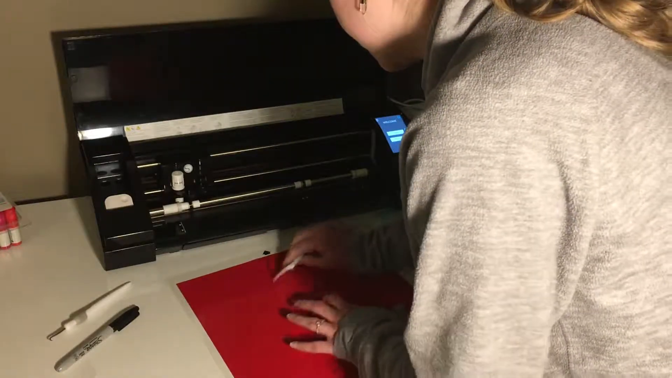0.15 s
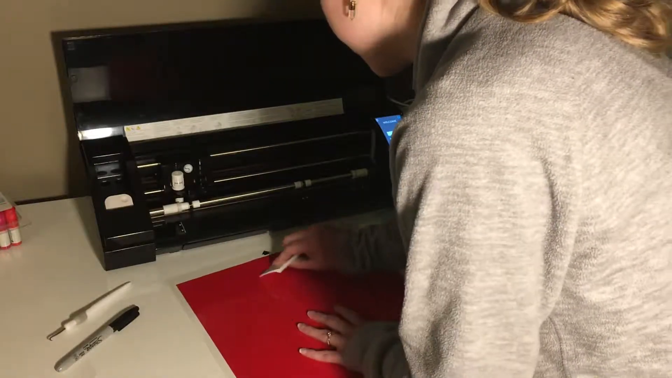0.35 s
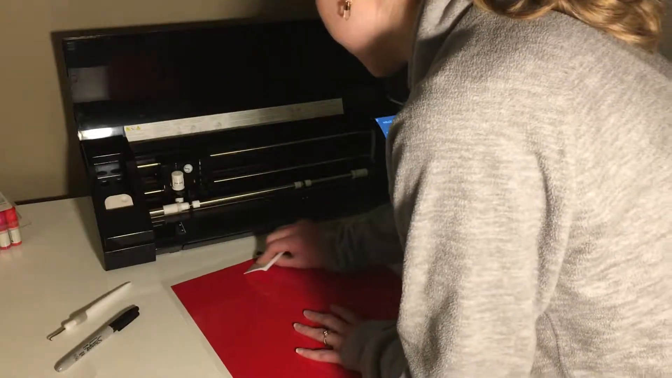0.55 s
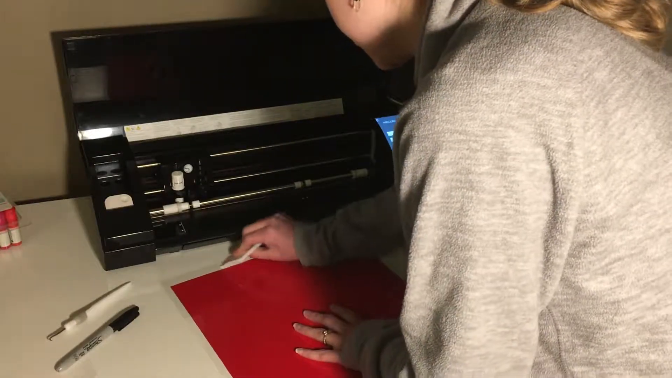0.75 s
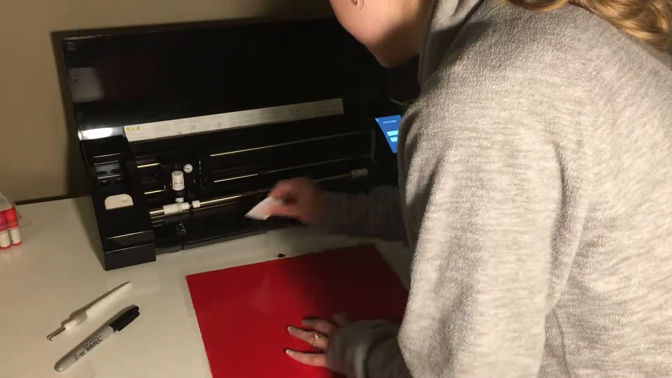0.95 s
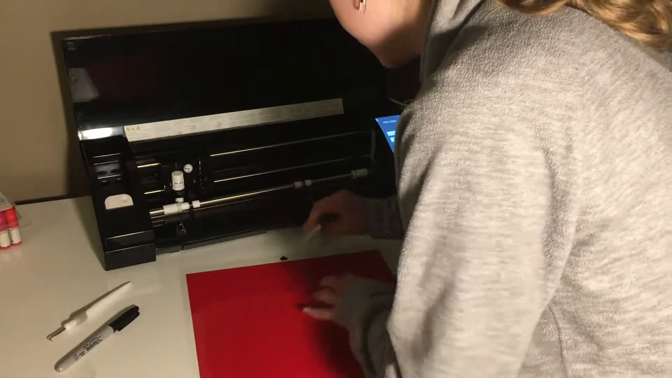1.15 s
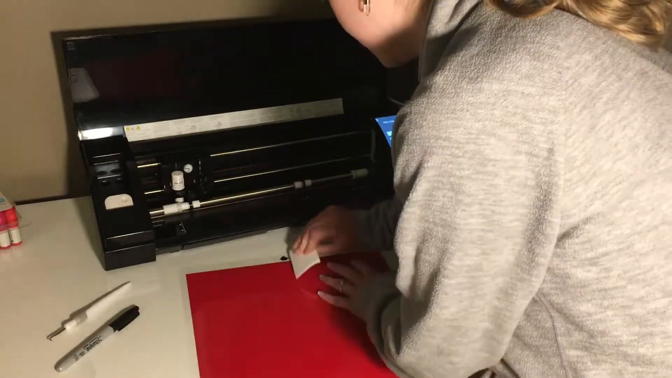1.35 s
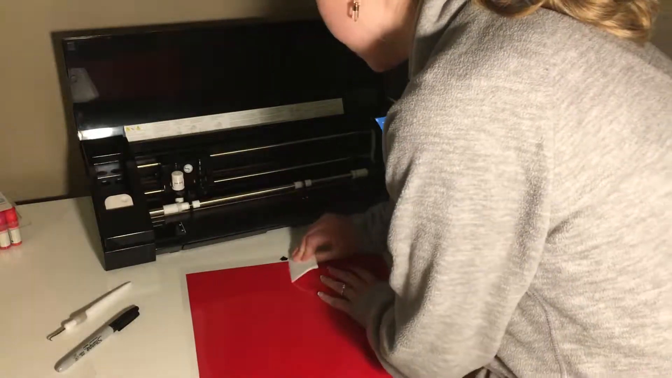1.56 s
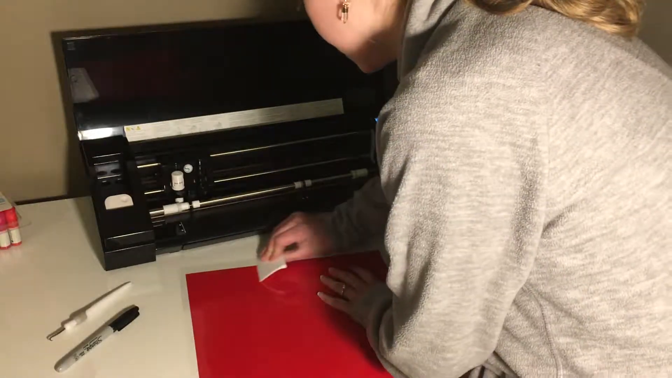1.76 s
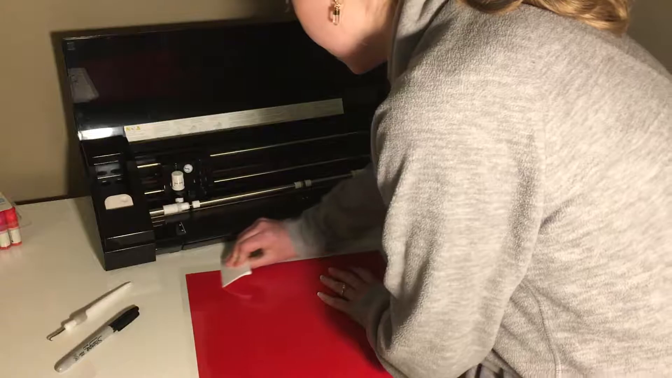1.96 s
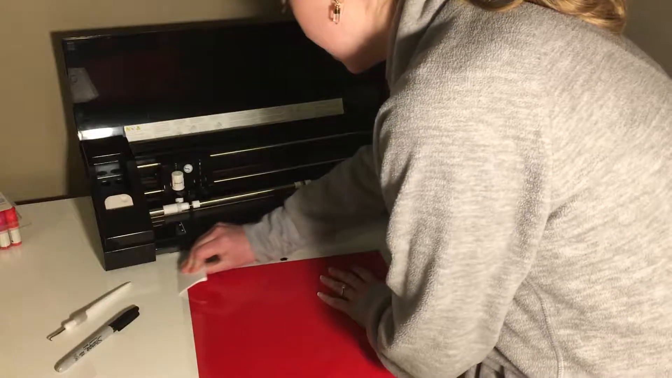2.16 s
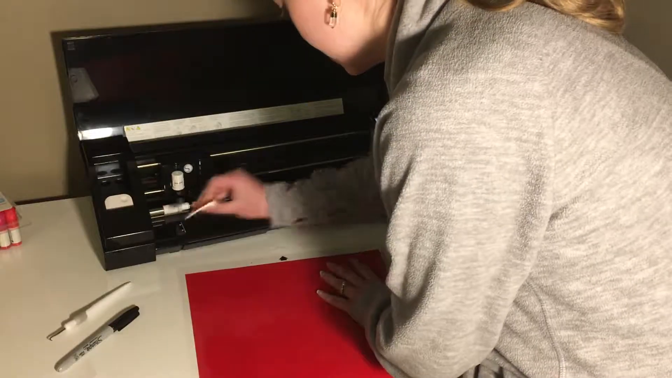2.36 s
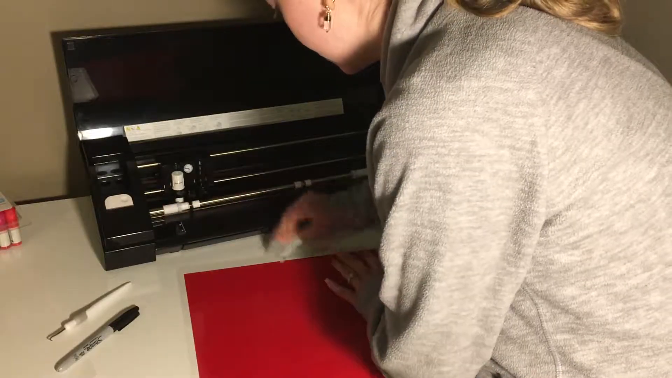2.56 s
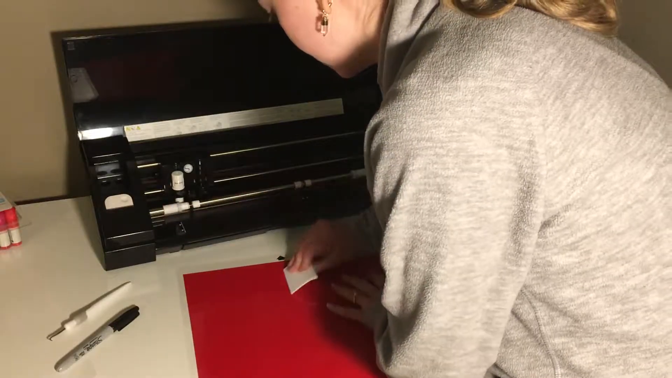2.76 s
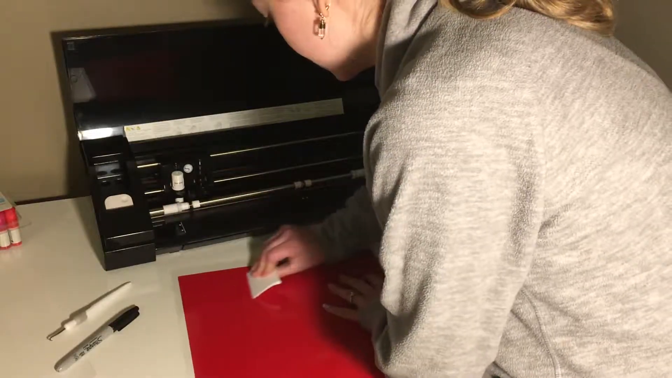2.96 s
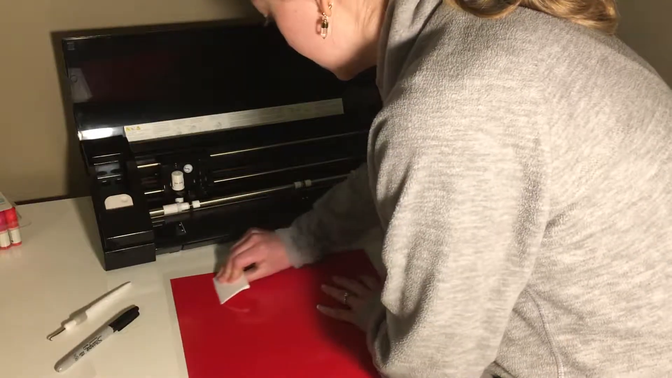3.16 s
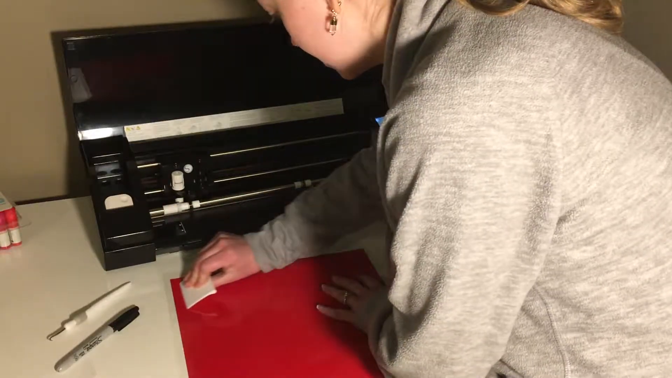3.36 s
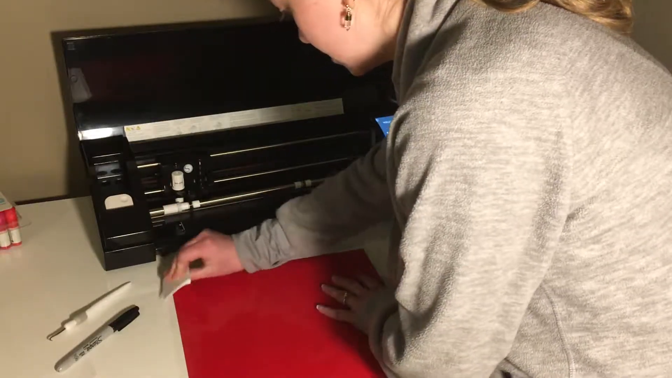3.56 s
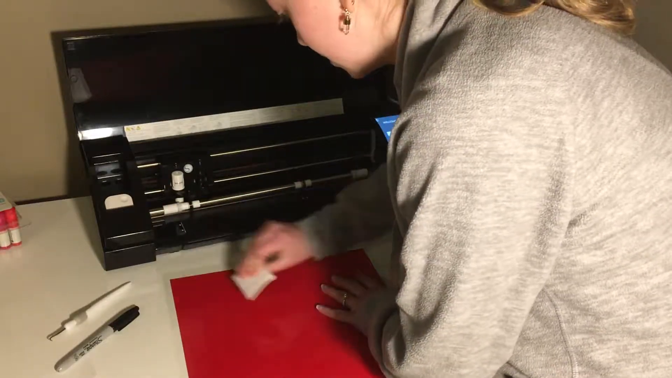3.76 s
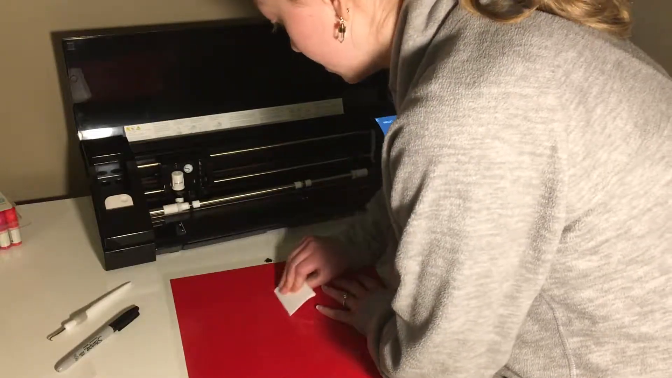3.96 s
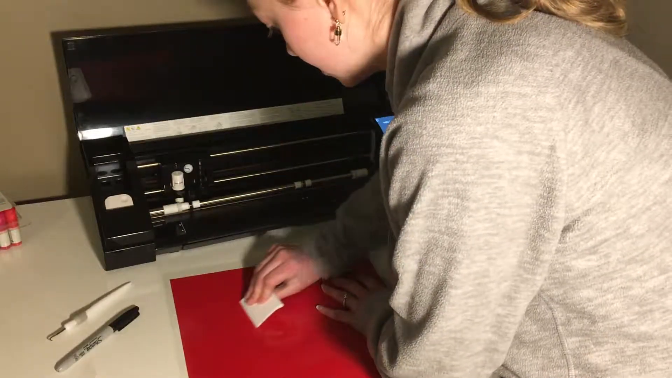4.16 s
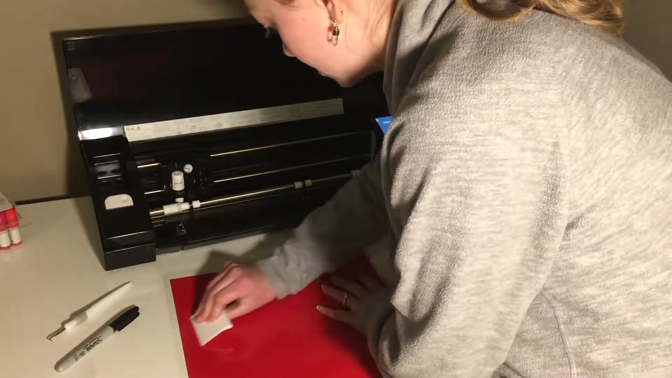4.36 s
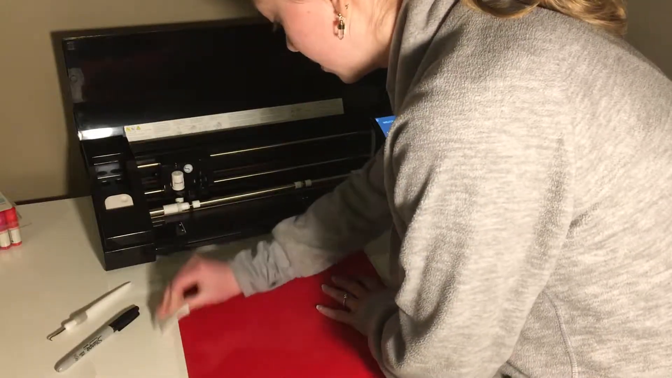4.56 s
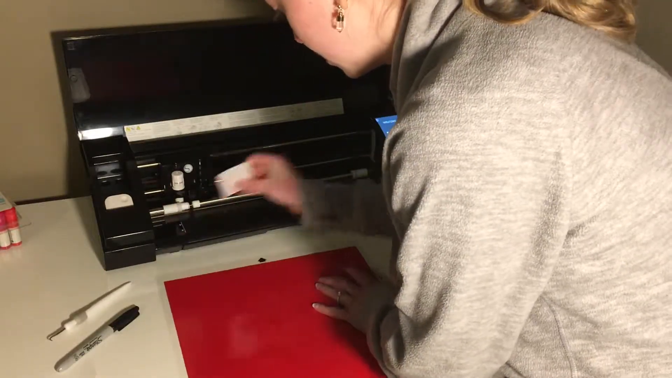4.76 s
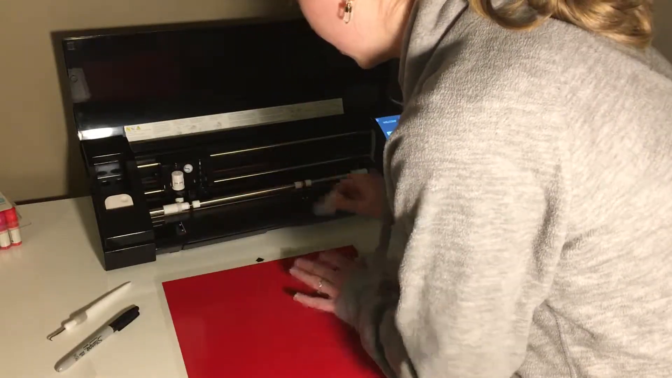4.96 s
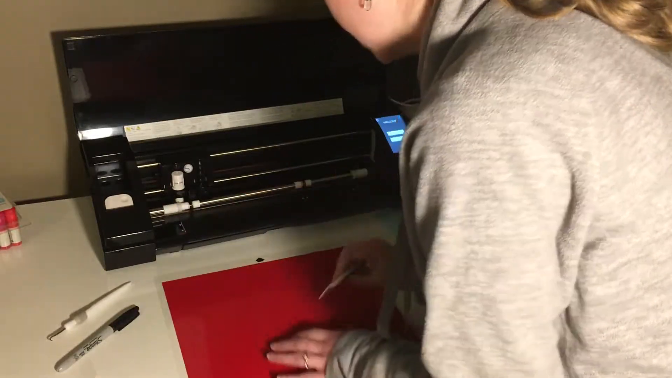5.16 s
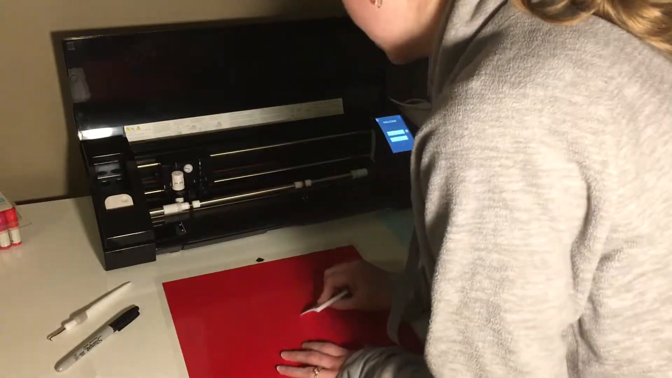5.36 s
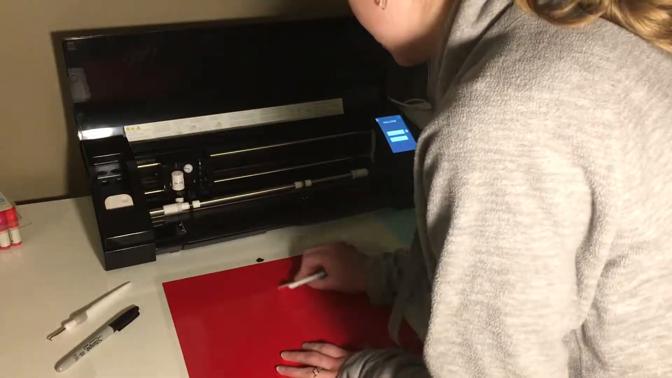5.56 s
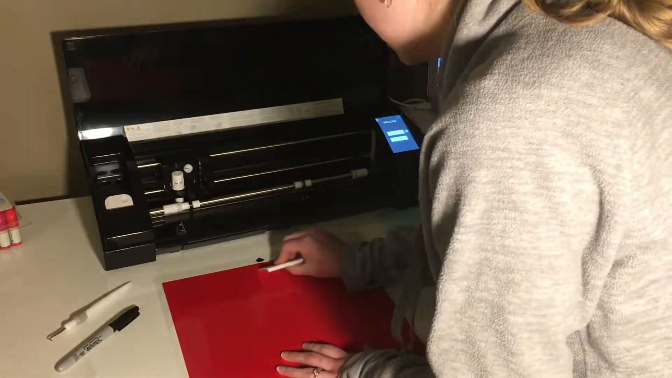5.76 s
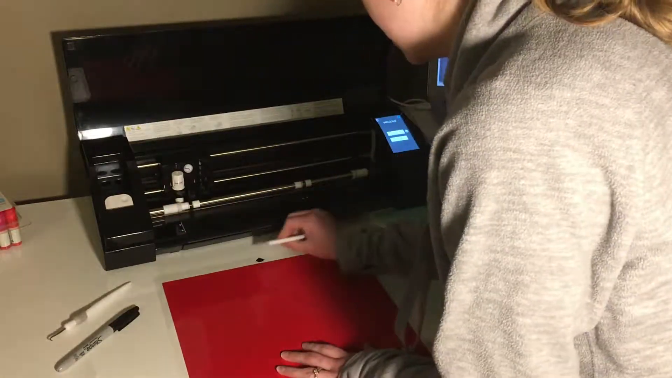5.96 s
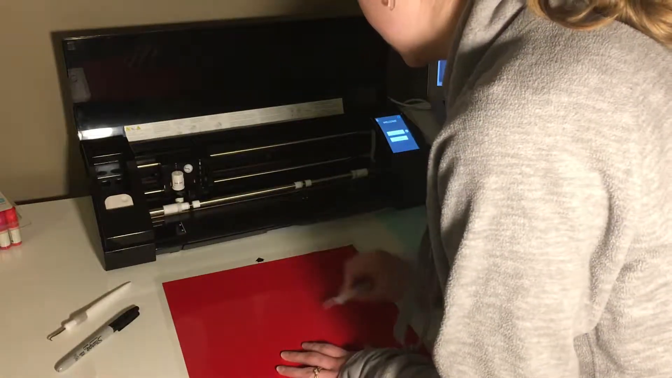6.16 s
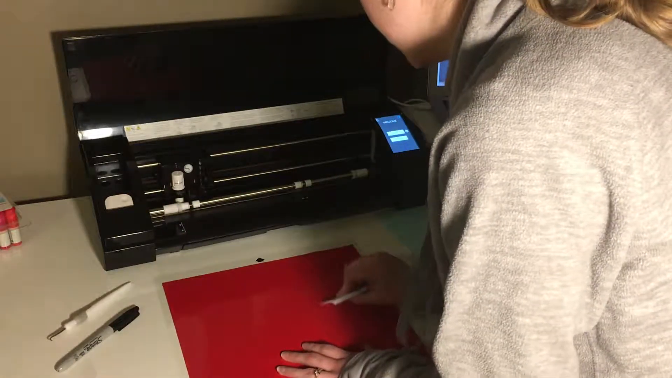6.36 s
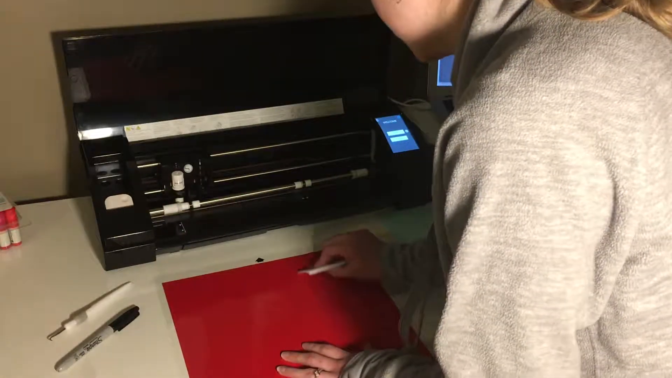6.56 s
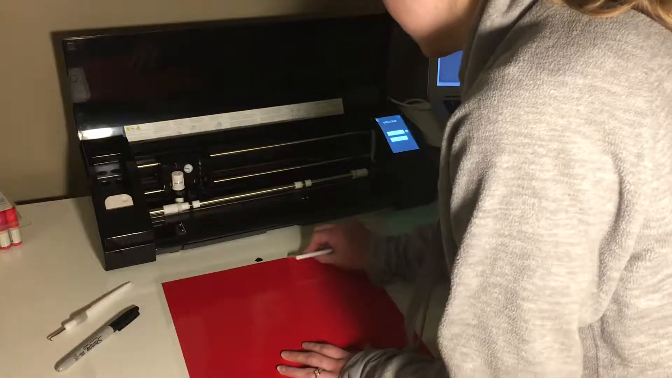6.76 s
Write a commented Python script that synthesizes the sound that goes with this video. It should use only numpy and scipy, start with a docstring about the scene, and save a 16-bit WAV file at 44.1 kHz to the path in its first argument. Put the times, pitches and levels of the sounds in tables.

```python
"""Scraper on a vinyl sheet

A plastic scraper is set down and dragged again and again over a vinyl sheet on a table, in a small quiet room.
Strokes are random friction noise passed through the resonances of scraper and table top, plus edge hiss.
Taps are short noise bursts with a ring, thuds are fading sine waves, and finger slides, sway and air are
shaped noise. Both channels carry the same sound."""
import sys
import numpy as np
from scipy import signal
from scipy.fft import rfft, irfft, next_fast_len
from scipy.io import wavfile
from scipy.ndimage import uniform_filter1d, map_coordinates

SR = 44100
rng = np.random.default_rng(int(sys.argv[2]) if len(sys.argv) > 2 else 0)


def persist_wave(psi):
    """Save psi, clipped to +-1, as 16-bit WAV."""
    counts = np.round(np.clip(psi, -1, 1) * 32767).astype(np.int16)
    wavfile.write(sys.argv[1], SR, np.atleast_2d(counts).T)


N = 300321  # length [samples]

# Strokes, one list each: (time [s], blade ring [dB], table top [dB re ring], edge hiss [dB re ring],
# upper blade modes [dB re ring])
STROKE_CURVES = [
    [(0.24, -77.5, 10, -5, 3), (0.27, -83, 6, 9, -3), (0.29, -68.5, -6, -4, -6),
     (0.416, -55.5, -1, -7.5, -5.5), (0.496, -73, 1.5, -6, -7), (0.654, -54, -3, -8, -7),
     (0.716, -56.5, -2.5, -6.5, -11.5), (0.744, -61.5, 1.5, -3, -1), (0.818, -56.5, -9, -12, -10.5),
     (0.838, -71.5, 1, 7, 0), (0.862, -63, -4.5, 2, -3.5), (0.98, -71.5, -14, 15, 9.5),
     (1.042, -66.5, -11, 8, 4), (1.11, -94, 3, 0, -4)],
    [(1.47, -94, 8, -2, 1), (1.52, -73, -3.5, -7, -9), (1.586, -57.5, -3.5, -8, -7),
     (1.756, -55, 0, -11.5, -5), (1.984, -53.5, -4, -8.5, -4), (2.014, -56, 0, -5.5, -0.5),
     (2.132, -55.5, -1, -8, -6.5), (2.178, -63.5, 6.5, -2, -6), (2.186, -51.5, -9, 1, -4.5),
     (2.236, -71, 3, -0.5, -4), (2.3, -96, 11, 3, -14)],
    [(2.39, -72, 3, -2, -2), (2.404, -74, -2, 15, -3), (2.418, -69.5, -10, 6, 2), (2.46, -99, 15, 6, 1)],
    [(2.77, -70, 5, -6, -4), (2.79, -76.5, -0.5, 6.5, -6), (2.864, -56.5, -4.5, -7, -5.5),
     (2.94, -50.5, -7.5, -5.5, -7), (3.018, -51.5, -6, -11, -5), (3.112, -66.5, 3, -2, -1.5),
     (3.138, -56, -2, -10, -8.5), (3.224, -54, -2, -8, -5), (3.47, -60.5, -1.5, -7.5, -12),
     (3.48, -58.5, 2.5, -3, -8), (3.546, -93.5, 16, 3, -6), (3.62, -99, 11, -5, -3)],
    [(3.985, -70, 3, -5, -6), (4.091, -54, -5, -5, -5), (4.217, -50, -4.5, -2.5, -2),
     (4.287, -54.5, -4, -2.5, 0), (4.327, -49.5, -8, -6.5, -3), (4.387, -60.5, 0.5, 1, 3),
     (4.421, -53.5, -4.5, -7, -4.5), (4.487, -64, 3.5, 0.5, -1.5), (4.513, -54.5, -9.5, -0.5, -2),
     (4.61, -95.5, 6.5, 0, -4)],
    [(5.32, -72, -2, 3, 2), (5.334, -73.5, -2.5, -8, -8), (5.44, -61, -7, -1.5, -5),
     (5.582, -53, -8, -3, -3.5), (5.788, -56, -4, -8.5, -3), (5.796, -59, 0, -5, -0.5),
     (5.832, -59.5, 3, -8, -2.5), (5.868, -54.5, -5.5, -9, -3), (5.908, -59, -0.5, -8, -7),
     (6.0, -102, 19.5, 4, -6)],
    [(6.28, -71.5, 3, 0, -1), (6.318, -63, -5, 0.5, 1), (6.366, -56, -8, -2.5, -7),
     (6.426, -54.5, -2.5, -1.5, -1.5), (6.452, -49.5, -9, -6, -4), (6.462, -52, -5.5, -1, -2),
     (6.59, -49.5, -8, -6.5, -6), (6.782, -60, 1, -5, -4), (6.795, -53.5, -2, -9, -7)],
]
# Where each stroke runs, at its start and its end: (deep table modes [dB re high ones],
# favour of the lower part of the high modes [dB], favour of the lower part of the deep modes [dB])
STROKE_PLACE = [((1.5, 3, 14), (0, 11, 5.5)), ((2.5, 6, 16), (1, 4.5, -5)), ((3, 4, -1.5), (3, 7, -1.5)),
                ((-0.8, 0.5, 0.5), (-0.4, 6.5, 8)), ((-2, -11.5, 0.4), (-2, 1.5, -0.4)), ((-2.5, -6, 2),
                (-0.5, 6, 1.8)), ((1.5, 0.4, -8.5), (-2.5, 2, -3))]
# How each stroke is held: (grip modes [dB re lower blade modes], fizz [dB re dull hiss],
# favour of the upper blade modes under the topmost ones [dB])
STROKE_HOLD = [(-3.5, -2, 3), (0.5, -6.5, 6.5), (-11, -1, 6), (0.9, -4, 7.5), (-0.2, -1, 6), (-1, -3.5, 3),
               (-0.6, -8.5, 3)]
# Table frame hum, one value for each stroke: level [dB re table top]
STROKE_HUM = [-3.5, -6.5, 7, -6, -4, -7.5, -4]
# Scraper sliding in the fingers while lifted: (time [s], level [dB])
FINGER_SLIDE = [(4.655, -76), (4.689, -75.5), (4.785, -68.5), (4.853, -81), (4.909, -95), (4.93, -90)]
# Soft resonance of that slide: (frequency [Hz], width [Hz])
FINGER_RESONANCE = (2760, 210)
# Contacts of the edge: (time [s], level [dB], ring frequency [Hz], ring strength [dB],
# skid strength [dB re tick], brightness [dB per octave])
EDGE_TAPS = [(0.2126, -36, 3500, 8, -0.5, -3.5), (0.275, -50, 9000, 14, 2, 0),
             (0.806, -44, 2580, 24, 4, -4), (0.863, -45, 1610, 16, 6.5, -2.5),
             (1.182, -53.5, 5670, 18, -4, 0), (1.381, -64, 2750, 18, 1, -4),
             (1.4182, -33.5, 3380, 9, -4, -2), (1.432, -52.5, 2000, -13, 9.5, -4.5),
             (2.148, -31.5, 3750, 12.5, -1, 3), (2.188, -37, 3000, 6, -5, 0),
             (2.3509, -44, 4500, -4, 2, -1.5), (2.378, -49.5, 4700, 7, 7.5, -2.5),
             (2.408, -36.5, 12700, 9, -6, 7), (2.41, -41, 8900, 10, -7, 1),
             (2.742, -44, 1700, 7, 7.5, -3.5), (3.475, -43, 9000, 3, 1, -1),
             (3.9615, -33, 7400, 6, -3, -4.5), (4.507, -51, 3170, 5, -24, 0),
             (4.648, -40, 12900, 10, -5, 7), (4.666, -52, 13500, 9, -15, 2),
             (4.692, -49.5, 4500, 7, 4.5, -4), (4.867, -54, 2190, -13, 7, -4),
             (4.891, -50, 10700, 8, -3, -2), (4.968, -58, 3560, 0, -1.5, -2),
             (5.277, -55.5, 2600, 19, -5, -2), (5.3, -57, 13000, 14, -6, 5),
             (5.313, -42, 4520, 10, -11, -2), (5.3363, -50, 2030, 10, 3, -5), (5.929, -44, 12500, 9, -6, 5),
             (6.26, -38.5, 2050, 12, 0.5, -2.5), (6.737, -27.5, 12500, 12, -8, -3.5),
             (6.742, -34, 11000, 8, -8, 9), (6.8034, -21, 3040, 14, 2, -5)]
# Thuds through the table legs: (time [s], level [dB], share of the lowest mode [0-1])
TABLE_THUDS = [(0.248, -50, 0.6), (0.799, -54, 0.1), (1.419, -48, 0.57), (2.149, -43, .1),
               (2.186, -39.5, 0), (2.76, -43, 0.72), (3.491, -41.5, 0.28), (3.969, -42, 0.6),
               (4.498, -52, 0.7), (4.69, -64, 0.1), (5.899, -49, 0.04), (6.266, -48.5, 0.3),
               (6.74, -43, 0.25)]
# Low modes of the table on its legs: (frequency [Hz], time to fade by 60 dB [s])
LEG_MODES = [(30, 0.52), (76, 0.17), (125, 0.072)]
# Rocking of table and stand: (time [s], slow rocking [dB], quick rocking [dB])
ROCKING_CURVES = [(0.0, -58.5, -68), (0.09, -47, -79), (0.25, -53.5, -59), (0.51, -43, -64),
                  (0.95, -55, -65), (1.86, -46, -64), (2.18, -56, -68), (2.29, -45.5, -63),
                  (3.58, -52, -65), (3.72, -39, -73), (3.87, -47, -63), (5.31, -48, -68.5),
                  (5.54, -65.5, -68), (6.05, -44.5, -59), (6.22, -54, -71), (6.35, -59, -56),
                  (6.54, -49, -59), (6.81, -57, -69)]
# Hum of the table frame: (frequency [Hz], relative level [dB])
FRAME_SPECTRUM = [(40, -18), (62, 1.5), (76, 6), (90, -7.5), (125, -4.5), (170, -20), (250, -56)]
# Hiss of the scraping edge: (frequency [Hz], relative level per Hz [dB])
EDGE_SPECTRUM = [(2940, -9), (5000, -6.5), (5950, -7), (6780, -1), (11100, -1), (12100, 1.5),
                 (15100, -11.5), (15900, -2)]
# Quiet room and microphone hiss: (frequency [Hz], relative level per Hz [dB])
AIR_SPECTRUM = [(26, -23), (45, 4.5), (70, -8.5), (139, -21), (192, -11), (400, -21), (654, -23.5),
                (2920, -28.5), (3300, -29.5), (8190, -28), (15900, -34.5)]
# Fading of the room's answer: (frequency [Hz], time to fade by 60 dB [s])
ROOM_DECAY = [(200, 0.54), (2000, 0.18), (10000, 0.071)]
# Sharp modes of the scraper blade: (frequency [Hz], width [Hz], level [dB])
BLADE_MODES = [(2360, 42, -1.5), (2450, 76, -3.5), (2680, 110, -11), (3043, 133, -0.5), (3450, 97, -2),
               (3400, 170, 1), (4050, 71, -3), (4500, 110, -6)]
# Blur of the many weak blade modes: (frequency [Hz], level [dB])
BLADE_BLUR = [(1500, -52), (2200, -2.5), (3200, -1), (4300, -8.5), (6000, -13), (10000, -23)]
# Sharp modes of the grip: (frequency [Hz], width [Hz], level [dB])
GRIP_MODES = [(1535, 46, -2.5), (1660, 48, -8), (1951, 55, 1)]
# Blur of the weak grip modes: (frequency [Hz], level [dB])
GRIP_BLUR = [(900, -35), (1400, -11), (2100, -9), (2800, -29)]
# Higher sharp modes of the table top: (frequency [Hz], width [Hz], level [dB])
HIGH_TOP_MODES = [(550.4, 34, 1), (646.4, 27, 2), (901.5, 31, -1), (1012, 25, -2), (1234, 18, -5.5)]
# Blur of the weak higher table modes: (frequency [Hz], level [dB])
HIGH_TOP_BLUR = [(350, -33), (500, -9.5), (1200, -9), (1800, -61)]
# Deep sharp modes of the table top: (frequency [Hz], width [Hz], level [dB])
DEEP_TOP_MODES = [(205.4, 24.4, -4.5), (257, 11, 4.5), (359, 27, -3), (415, 12, -14.5)]
# Blur of the weak deep table modes: (frequency [Hz], level [dB])
DEEP_TOP_BLUR = [(120, -27), (200, -17.5), (450, -9.5), (650, -44)]

AIR_DB, HUM_REST_DB = -74.5, -75  # quiet air; frame hum at rest
ROOM_DB = -20.0  # the room's answer to the taps
FINGER_HISS_DB = 2.5  # relative to the soft resonance
HUM_GROWS_DB = 4.5  # from start to end of a stroke, as the arm reaches out
GRIP_WITH_STEEP, FIZZ_WITH_STEEP = -0.15, 0.36  # dB gained per dB of the upper blade modes
SKID_S, SKID_GROWS_S = 0.017, 0.00039  # length setting at skid strength 0 dB [s]; growth [s per dB]
TOP_HZ = 15950  # nothing is kept from here up


def amp(db):
    """Gain of a level in dB."""
    return 10 ** (np.asarray(db) / 20)


def unit(x):
    """Scale x to an average strength (rms) of 1."""
    return x / np.sqrt(np.mean(x ** 2) + 1e-20)


def along(points, hz):
    """Read (frequency, value) points at any frequency, on a log axis."""
    f, v = np.transpose(points)
    return np.interp(np.log(hz + 1), np.log(f + 1), v)


def curves(rows):
    """One value per sample for each column after the time."""
    s, *cols = np.transpose(rows)
    return [np.interp(np.arange(N) / SR, s, c) for c in cols]


def gate(rows, fade=0.016):
    """1 while a table lasts, with short fades outside it."""
    start, end = rows[0][0], rows[-1][0]
    return np.interp(np.arange(N) / SR, [start - fade, start, end, end + fade], [0, 1, 1, 0])


def wobble(rate):
    """A smooth random curve, with rate random points a second."""
    points = rng.standard_normal(int(N * rate / SR) + 4)
    return map_coordinates(points, [np.arange(N) * rate / SR])


def filtered(x, response):
    """Multiply the spectrum of x by a response that depends on frequency."""
    m = next_fast_len(N + SR // 2)
    return irfft(rfft(x, m) * response(np.fft.rfftfreq(m, 1 / SR)), m)[..., :N]


def coloured(x, spectrum):
    """x shaped by a spectrum of (frequency, dB) points, at rms 1."""
    return unit(filtered(x, lambda hz: amp(along(spectrum, hz))))


def modes(table, f):
    """Response of several resonances added up, with alternating signs."""
    total = 0
    for k, (centre, width, db) in enumerate(table):
        resonance = 1j * f * width / (centre * centre - f * f + 1j * f * width)
        total = total + (-1) ** k * amp(db) * resonance
    return total


def body(x, peaks, blur):
    """x through sharp modes over the blur of many weak ones, at rms 1."""
    return unit(filtered(x, lambda hz: np.hypot(np.abs(modes(peaks, hz)), amp(along(blur, hz)))))


def split(x, edge_hz):
    """The parts of x under and over a frequency, each held at an even rms of 1."""
    low = filtered(x, lambda hz: 1 / (1 + (hz / edge_hz) ** 8))
    return [part / np.sqrt(np.abs(uniform_filter1d(part ** 2, size=8000)) + 1e-20) for part in (low, x - low)]


def tipped(x, edge_hz, favour_db):
    """x with its lower part favoured over its upper part by a number of dB."""
    under, over = split(x, edge_hz)
    return (amp(favour_db) * under + over) / np.hypot(amp(favour_db), 1)


def air():
    """Quiet room and microphone hiss: steady noise with a fixed spectrum."""
    return amp(AIR_DB) * coloured(rng.standard_normal(N), AIR_SPECTRUM)


def sway():
    """Rocking and the resting hum of the table frame reach the microphone through its stand."""
    slow_db, quick_db = curves(ROCKING_CURVES)
    slow = coloured(rng.standard_normal(N), [(2, -47), (5, 6.5), (8.5, -17.5), (13, -4.5), (20, -34), (40, -83)])
    quick = coloured(rng.standard_normal(N), [(10, -48), (20, 2.5), (30, 5.5), (38, -11.5), (70, -62.5)])
    hum = amp(HUM_REST_DB) * coloured(rng.standard_normal(N), FRAME_SPECTRUM)
    return amp(slow_db) * slow + amp(quick_db) * quick + hum


def room(x):
    """The walls' answer is a noise tail in which each frequency dies at its own speed."""
    hz, t, z = signal.stft(rng.standard_normal(SR // 2), SR, nperseg=256)
    decay = amp(-60 * t / along(ROOM_DECAY, hz)[:, None])
    tail = signal.istft(z * decay, SR, nperseg=256)[1]
    delayed = np.pad(x, (200, 0))  # samples
    return signal.fftconvolve(delayed, tail / np.linalg.norm(tail))[:N]


def thuds():
    """Each push or release rocks the table's low modes, which ring as fading sine waves."""
    out, t = np.zeros(N + SR), np.arange(SR // 2) / SR
    for s, db, low in TABLE_THUDS:
        shares = (low, 1 - low, 0.37 * (1 - low))
        ring = np.zeros(len(t))
        for share, (hz, t60) in zip(shares, LEG_MODES):
            ring += share * np.sin(2 * np.pi * hz * t) * amp(-60 * t / t60)
        soft_start = 1 - np.exp(-t / 0.0032)
        out[round(s * SR):][:len(t)] += amp(db) * ring * soft_start
    return out[:N]


def causal(colour):
    """Turn a colour into a response that starts at once, by folding its cepstrum."""
    fold = irfft(np.log(unit(colour) + 1e-6))
    half = len(fold) // 2
    fold[1:half] *= 2
    fold[half + 1:] = 0
    return np.exp(rfft(fold))


def taps():
    """A sharp tick, then a brief gritty skid as the rest of the edge lands; where it lands sets the ring."""
    out, t = np.zeros(N + SR), np.arange(4096) / SR
    hz = np.fft.rfftfreq(len(t), 1 / SR)
    for s, db, ring_hz, ring_db, skid_db, tilt_db in EDGE_TAPS:
        tick = rng.standard_normal(len(t)) * amp(-60 * t / 0.0018)
        tick /= np.abs(tick).max()

        length = max(SKID_S + SKID_GROWS_S * skid_db, .003)
        roughness = unit(uniform_filter1d(rng.standard_normal(len(t)), size=16))
        grit = unit(rng.standard_normal(len(t)) * amp(4.0 * roughness))
        swell = t / length * np.exp(1 - (t / length) ** 1.17 * 3.7)  # rises, then dies away
        skid = amp(skid_db - 7) * grit * swell

        scraper_ring = 0.5 * np.abs(modes(GRIP_MODES + BLADE_MODES, hz))
        spot_ring = np.abs(modes([(ring_hz, 0.19 * ring_hz, ring_db)], hz))
        tilt = amp(tilt_db * np.log2((hz + 300) / 5000))
        colour = tilt * hz / (hz + 900) * (1 + scraper_ring + spot_ring)
        out[round(s * SR):][:len(t)] += amp(db) * irfft(rfft(tick + skid) * causal(colour))
    return out[:N]


def fingers():
    """Skin sliding on the lifted scraper: one soft resonance and a thin hiss."""
    level_db, = curves(FINGER_SLIDE)
    whistle = unit(filtered(rng.standard_normal(N), lambda hz: modes([(*FINGER_RESONANCE, 0)], hz)))
    hiss = amp(FINGER_HISS_DB) * coloured(rng.standard_normal(N), EDGE_SPECTRUM)
    return gate(FINGER_SLIDE) * amp(level_db) * (whistle + hiss)


def friction(grit_db, patchy_db, drift):
    """Dense tiny slips of uneven size; the contact point travels, so fine resonances swell, fade and slide."""
    slips = rng.standard_normal(N) * amp(grit_db * wobble(1200))
    z = signal.stft(slips, nperseg=2048)[2]
    field = uniform_filter1d(rng.standard_normal(z.shape), size=2, axis=0)  # smooth over frequency
    field = unit(uniform_filter1d(field, size=9, axis=1))  # smooth over time
    bins, frames = np.indices(z.shape)
    slide = 1 + drift * wobble(2.5)[np.minimum(frames * 1024, N - 1)]
    field = map_coordinates(field, [bins * slide, frames], order=1, mode="mirror")
    return signal.istft(z * amp(patchy_db * field), nperseg=2048)[1][:N]


def controls():
    """Gains of the rubbed parts: one curve and a few values for each stroke drive them all."""
    levels, favour_db = np.zeros((8, N)), np.zeros((3, N))
    for rows, hold, (start, end), hum_db in zip(STROKE_CURVES, STROKE_HOLD, STROKE_PLACE, STROKE_HUM):
        grip_db, fizz_db, blade_db = hold
        ring_db, top_db, hiss_db, steep_db = curves(rows)
        reach, deep_db, *lower_db = curves([(rows[0][0], -.5, *start), (rows[-1][0], .5, *end)])
        lean_db = steep_db - np.median(rows, axis=0)[-1]  # upper modes against the stroke's middle value
        grip = amp(grip_db + GRIP_WITH_STEEP * lean_db)
        fizz = amp(fizz_db + FIZZ_WITH_STEEP * lean_db)
        deep = amp(deep_db)
        # two parts share one level
        flat, high, dull = (1 / np.hypot(1, g) for g in (grip, deep, fizz))
        top, hiss = amp(top_db), amp(hiss_db)
        hum = top * amp(hum_db + HUM_GROWS_DB * reach)
        parts = [flat, amp(steep_db), flat * grip, top * high, top * high * deep,
                 hiss * dull, hiss * dull * fizz, hum]
        levels += gate(rows) * amp(ring_db) * parts
        favour_db += gate(rows) * [*lower_db, np.full(N, blade_db)]
    return levels, favour_db


def strokes():
    """Rubbing drives blade, grip, table top and edge hiss together; the hand judders slightly."""
    levels, (high_favour_db, deep_favour_db, blade_favour_db) = controls()
    blade, rasp, grip, high, deep, hiss, fizz, hum = levels
    judder = amp(.6 * wobble(30))

    blade_rub = body(friction(grit_db=0.0, patchy_db=4.5, drift=0.028), BLADE_MODES, BLADE_BLUR)
    flat, steep = split(blade_rub, edge_hz=2970)  # a steeper blade rings in its upper modes
    grip_rub = body(friction(grit_db=0.5, patchy_db=4.0, drift=0.042), GRIP_MODES, GRIP_BLUR)
    scraper = blade * flat + rasp * tipped(steep, edge_hz=4420, favour_db=blade_favour_db)
    scraper += grip * tipped(grip_rub, edge_hz=1570, favour_db=-6.0)

    high_rub = body(friction(grit_db=2.5, patchy_db=7.0, drift=0.017), HIGH_TOP_MODES, HIGH_TOP_BLUR)
    deep_rub = body(friction(grit_db=-0.5, patchy_db=5.5, drift=0.064), DEEP_TOP_MODES, DEEP_TOP_BLUR)
    top = high * tipped(high_rub, edge_hz=880, favour_db=high_favour_db)
    top += deep * tipped(deep_rub, edge_hz=355, favour_db=deep_favour_db)
    top += hum * coloured(rng.standard_normal(N), FRAME_SPECTRUM)

    edge_rub = coloured(friction(grit_db=1.0, patchy_db=3.0, drift=.05), EDGE_SPECTRUM)
    dull, fine = split(edge_rub, edge_hz=10800)
    return judder * (scraper + top + hiss * dull + fizz * fine)


def scene():
    """Quiet air, table, taps with the room's answer, fingers and strokes, the same in both channels."""
    ticks = taps()
    mono = air() + sway() + thuds()
    mono += ticks + amp(ROOM_DB) * room(ticks)
    mono += fingers() + strokes()
    return np.array([mono, mono])


def record(dry):
    """Nothing is kept above the band limit."""
    return filtered(dry, lambda hz: hz < TOP_HZ)


dry = scene()
out = record(dry)
persist_wave(out)
```